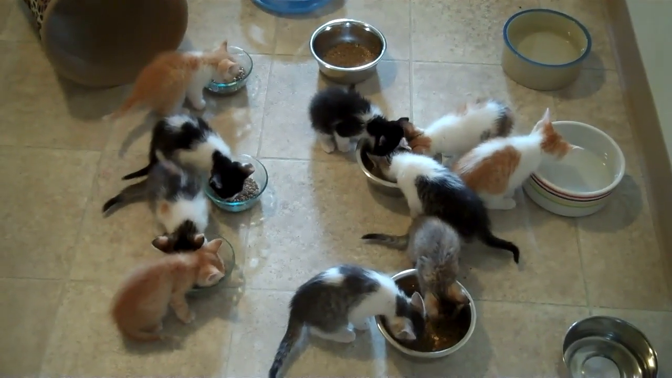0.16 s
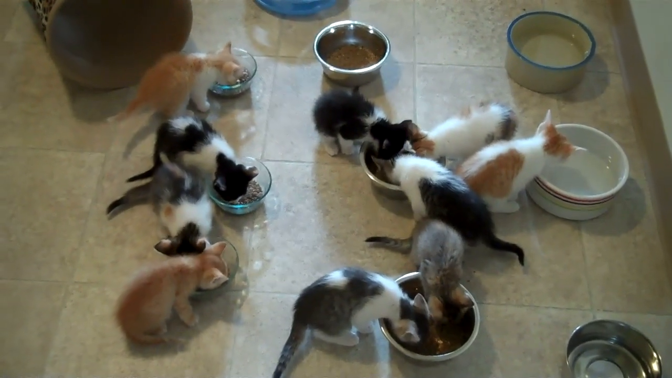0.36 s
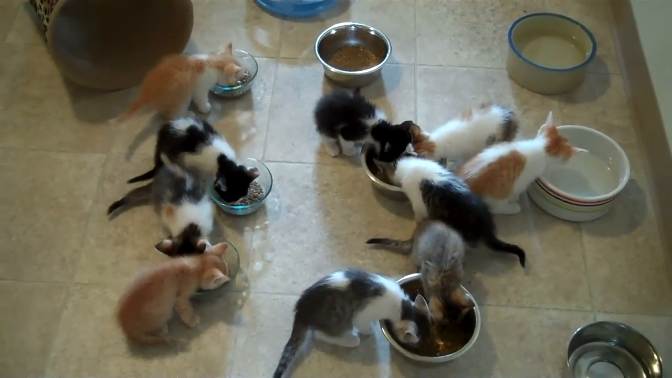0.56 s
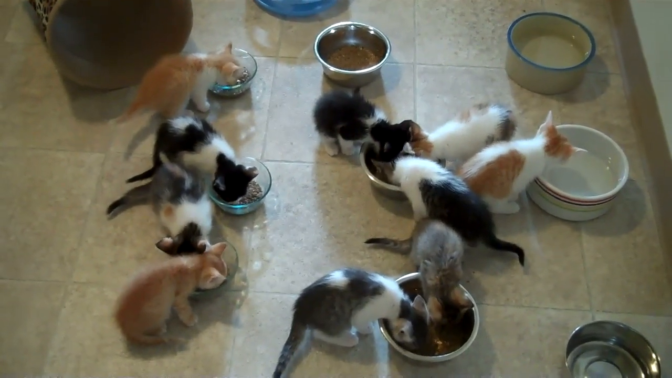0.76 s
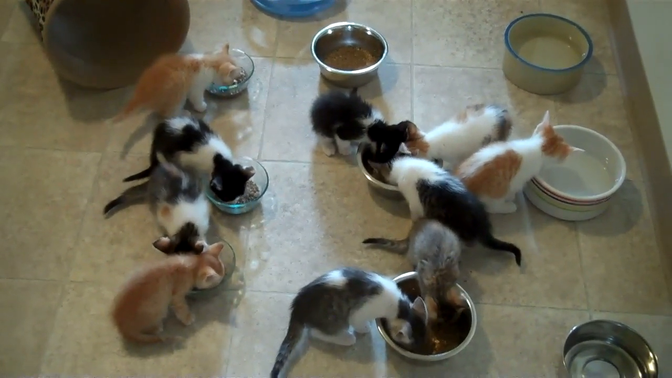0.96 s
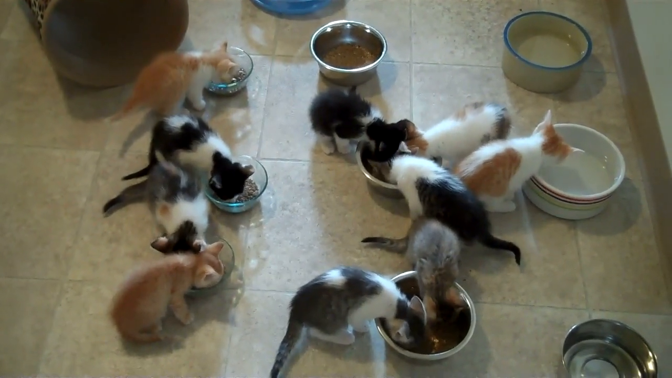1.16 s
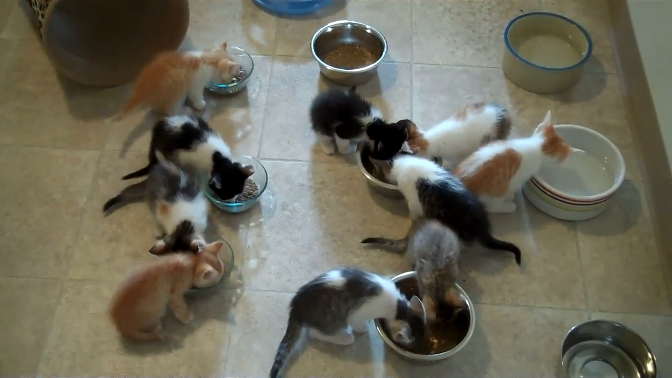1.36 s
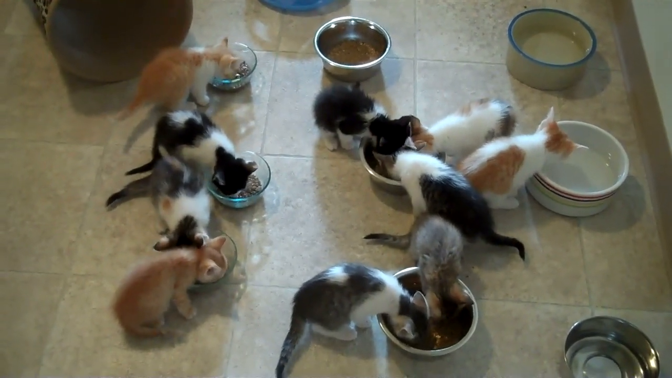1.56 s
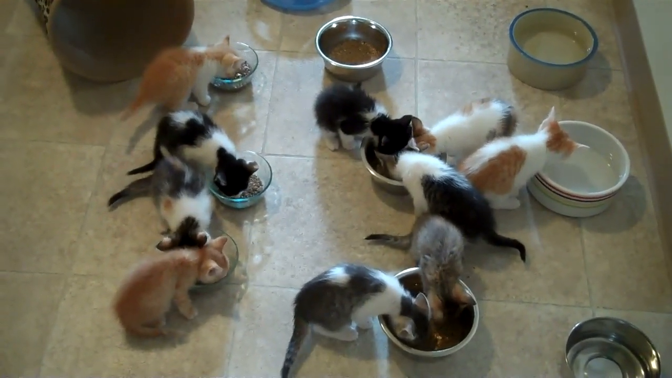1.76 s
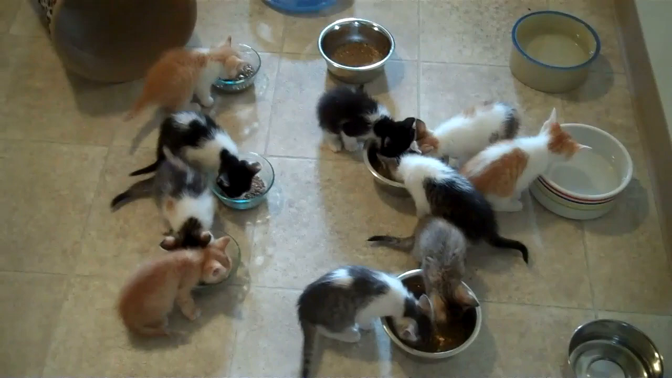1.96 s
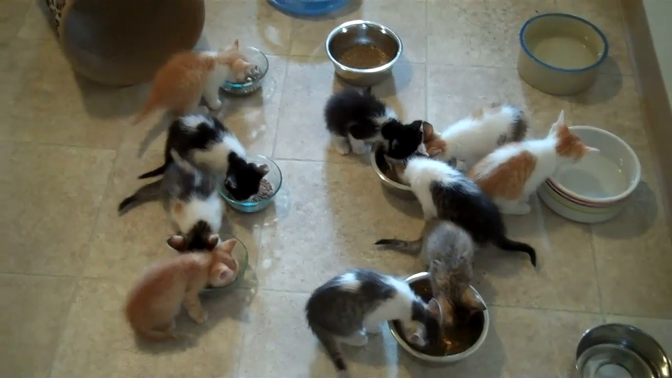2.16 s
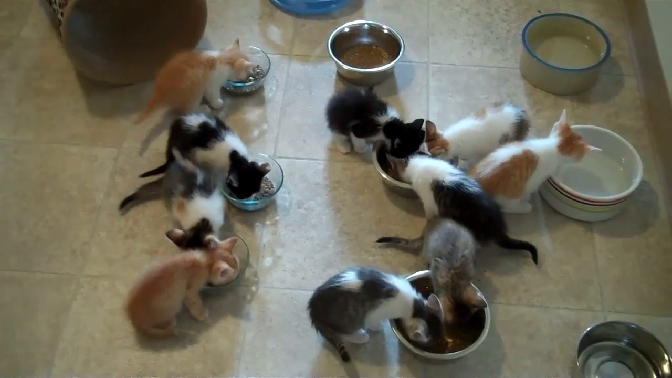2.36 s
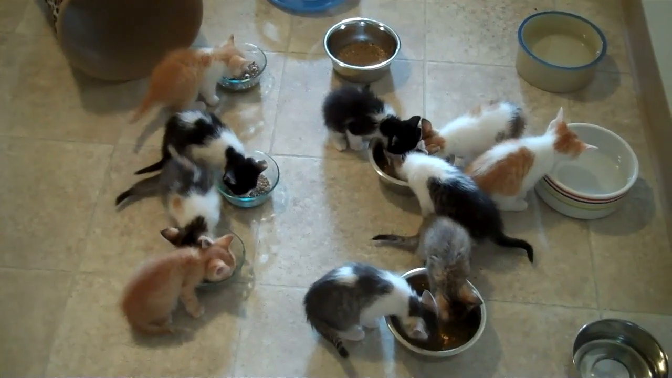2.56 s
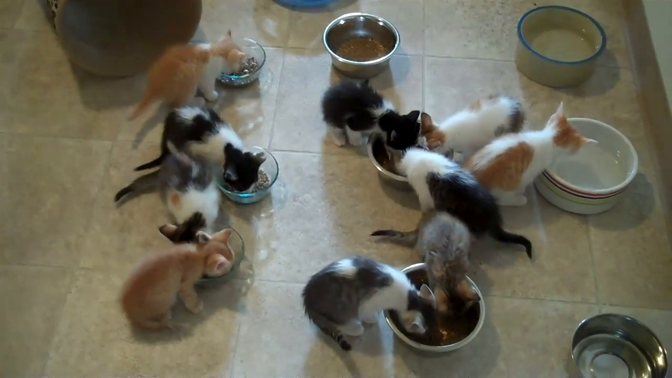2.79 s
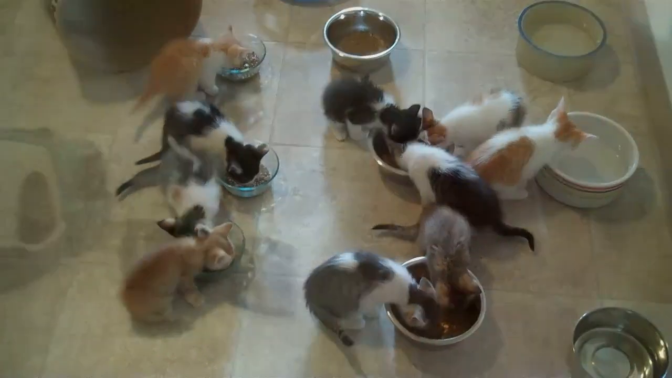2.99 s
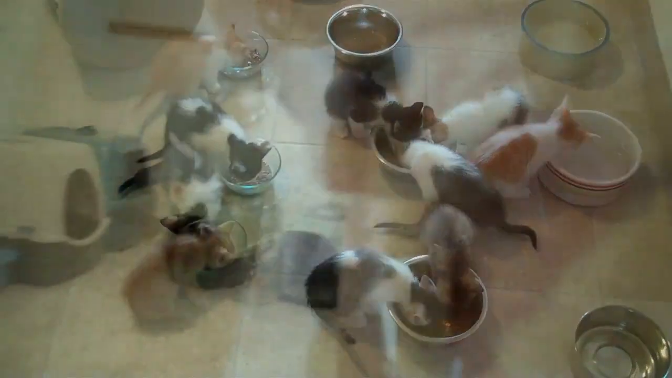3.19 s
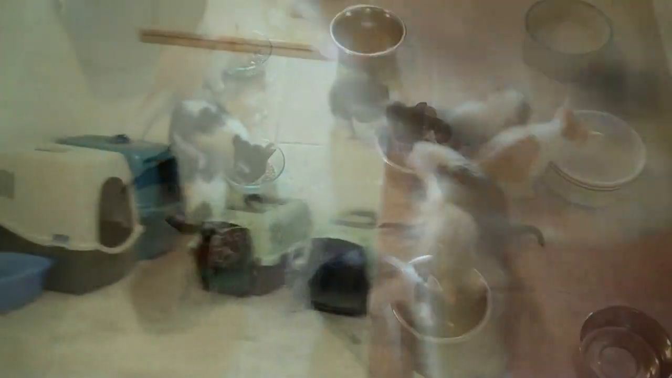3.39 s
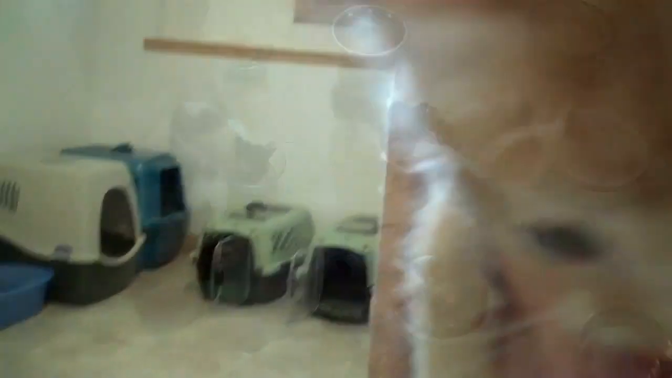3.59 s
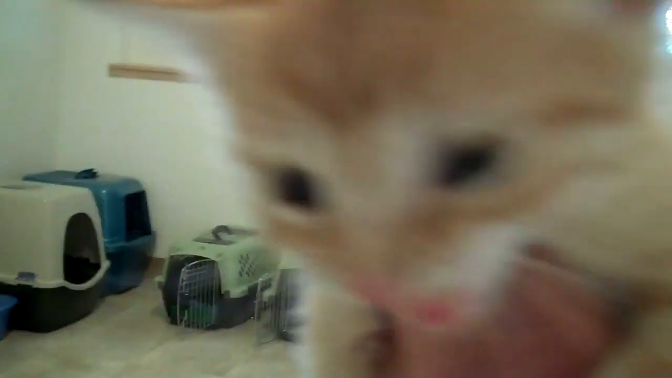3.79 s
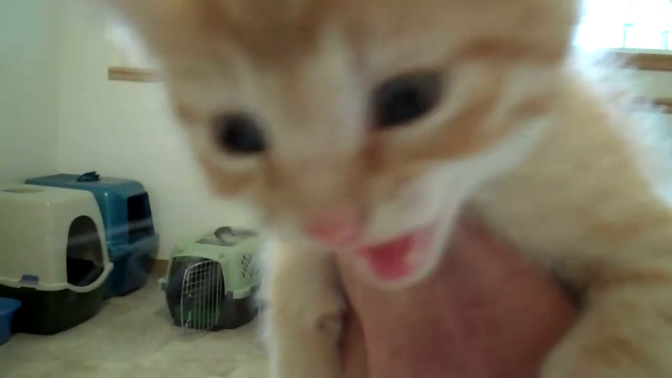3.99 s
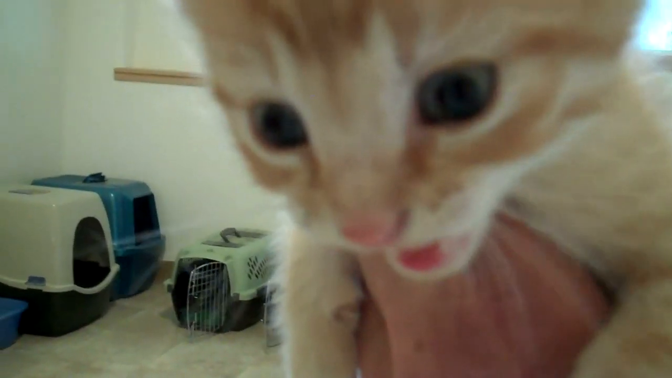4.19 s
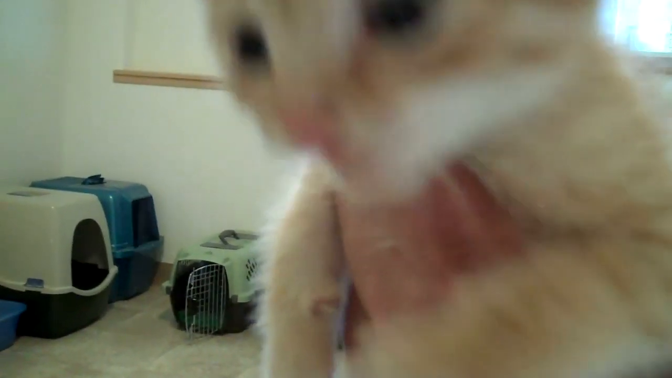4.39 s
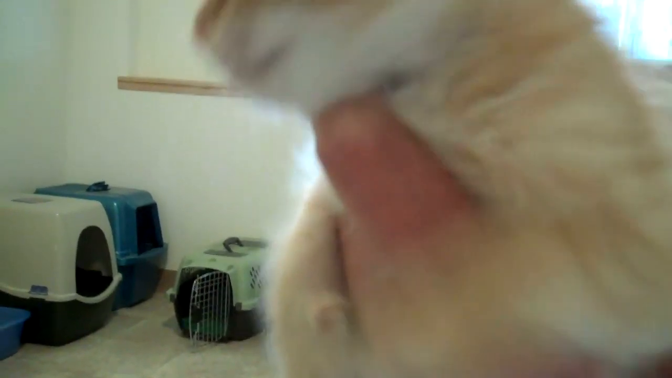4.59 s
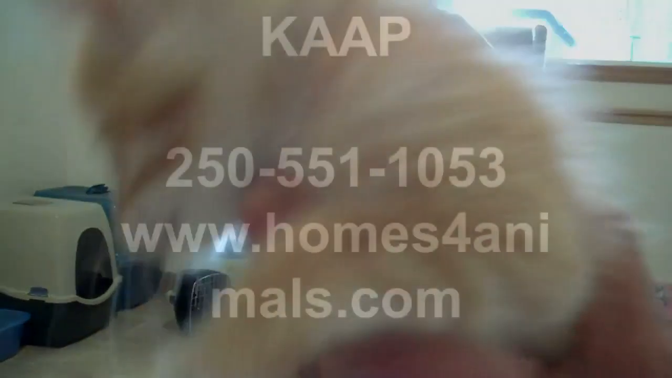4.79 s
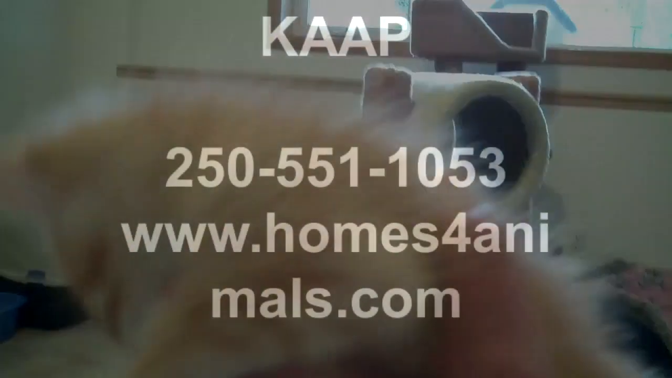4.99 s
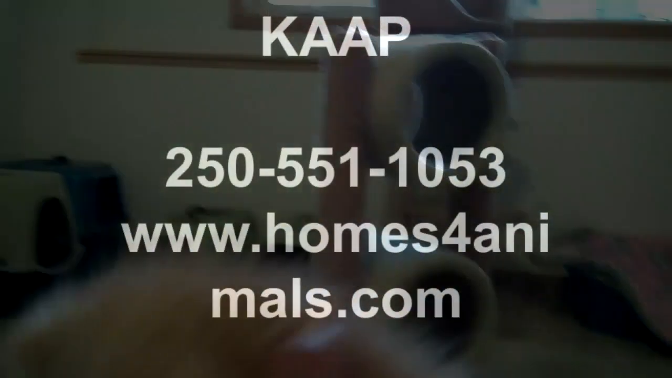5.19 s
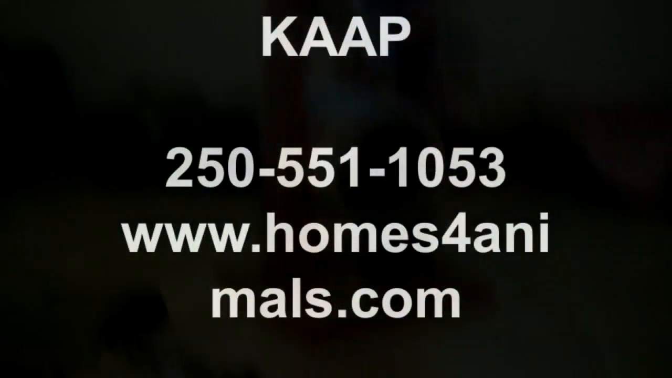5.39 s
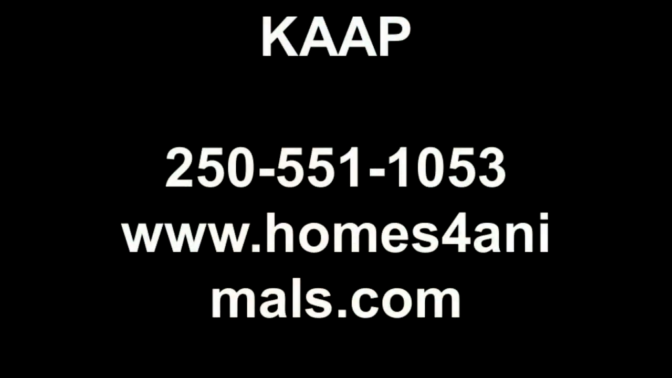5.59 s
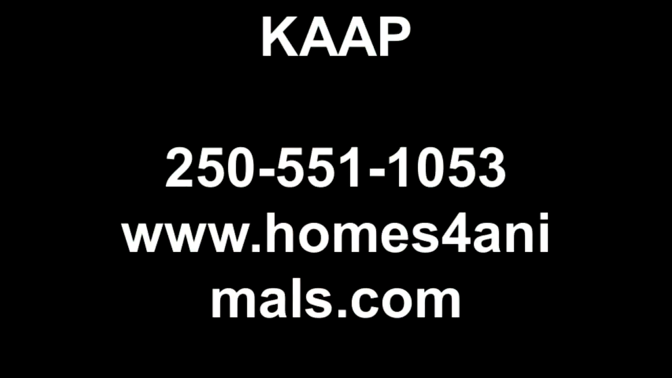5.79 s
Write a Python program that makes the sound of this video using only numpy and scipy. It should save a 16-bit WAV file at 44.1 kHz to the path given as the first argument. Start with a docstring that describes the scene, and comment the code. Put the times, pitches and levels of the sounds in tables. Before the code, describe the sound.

Kittens crunch dry food with faint ticks and bowl clinks in a quiet room, then one close kitten gives a loud, piercing meow.

```python
"""A close kitten gives one loud, piercing meow: vocal fold harmonics and breath through a mouth
that opens and closes, with wet smacks and soft hiss around it. Before that, kittens eat dry food
in a small room: kibble snaps and crumbles, nudged bowls ring, jaws patter.
Two faint mews come from across the room. Quiet room tone lies under it all; the end fades out."""
import sys
import numpy as np
from scipy import signal
from scipy.fft import rfft, irfft, next_fast_len
from scipy.io import wavfile
from scipy.ndimage import map_coordinates

SR = 44100
rng = np.random.default_rng(int(sys.argv[2]) if len(sys.argv) > 2 else 0)


def transcribe(signal):
    """Save signal, clipped to [-1, 1], as a 16-bit WAV file at the path in sys.argv[1]."""
    frames = np.atleast_2d(signal).T
    limited = np.clip(frames, -1, 1)
    pcm = np.round(limited * 32767).astype(np.int16)
    wavfile.write(sys.argv[1], SR, pcm)


N = 257984
TIME = np.arange(N) / SR
RECEDE_S, RECEDE_LENGTH_S = 2.7, 0.91  # chewing and room tone drop as the close kitten comes near

# Microphone colour: the highest treble is louder on the left.
# Each row: frequency in Hz, left minus right in dB.
CLOSE_BALANCE = [(700, -1), (1200, 0.5), (3500, 0), (6000, -2.5), (7300, 6), (8600, 18), (14000, 17.5)]


def meow(soften_db=-20, ear_lag_s=.000015):
    """Vocal fold harmonics and breath, shaped by a mouth that opens and closes."""
    # The call creaks, leaps up, sags, drops and flicks. Each row: time in seconds, pitch in Hz.
    contour = [(3.79, 607), (3.82, 579.3), (3.845, 711), (3.882, 719), (3.914, 1064), (3.936, 1203),
               (3.98, 1224), (4.03, 1232), (4.1, 1213), (4.165, 1218), (4.27, 1163), (4.32, 1164),
               (4.4, 1125), (4.44, 1119), (4.49, 1063), (4.526, 973), (4.546, 689.4), (4.558, 731),
               (4.567, 1150)]
    # Throat response. Each row: frequency in Hz, gain in dB nearly shut, half open, wide open.
    throat = [(598, -0.5, -15, -26.5), (1135, 4.5, 2, -13), (1450, -12.5, -9.5, -16.5),
              (2232, -8.5, -13, -9.5), (3310, -7, 4.5, -2.5), (4592, -21, -16.5, -1),
              (5276, -24.5, 0.5, 18), (5740, -11.5, 15.5, 20.5), (7070, -3.5, 5, 16.5), (7100, -4.5, 3, 25),
              (8685, -16, -1.5, -1), (9470, -45.5, -7, -6.5), (10800, -44, -25.5, -14.5),
              (13480, -59, -50, -44)]
    t = np.arange(round(contour[0][0] * SR), round(contour[-1][0] * SR)) / SR
    n = len(t)
    pitch = np.interp(t, *np.transpose(contour))
    slack = np.clip((1130 - pitch) / 300, 0, 1)  # slack folds beat unevenly and close softly
    db, shrill_db, rough = vocal_effort(t, pitch, slack)
    waver = rough * ((.005 + .028 * slack) * wobble(900, n) + .0018 * wobble(300, n))
    waver += .012 * np.sqrt(slack) * wobble(190, n)
    phase = 2 * np.pi * np.cumsum(pitch * (1 + waver)) / SR
    mouth = mouth_opening(t, pitch)
    shares = [np.clip(1 - abs(2 * mouth - i), 0, 1) for i in range(3)]
    shapes = [np.array(throat)[:, [0, i + 1]] for i in range(3)]
    treble = lambda hz: along([(4300, 0.049), (5600, 1)], hz)
    voice = np.zeros(n)
    for k in range(1, 13):
        hz = k * pitch
        throat_db = sum(share * along(shape, hz) for share, shape in zip(shares, shapes))
        folds_db = soften_db * np.sqrt(slack) * (k > 8) + 3 * slack * wobble(250, n) * (k > 1)
        flutter_db = .55 * wobble(45, n)
        gain = amp(db + throat_db + shrill_db * treble(hz) + folds_db + flutter_db)
        voice += gain * np.cos(k * phase - np.pi * np.sqrt(hz / 400))
    voice *= 1 + .055 * rough * wobble(700, n)  # shimmer
    # Air spurts through the folds once a cycle; slack folds leak more.
    spurts = (1 + .7 * np.cos(phase)) * amp(2 * wobble(130, n))
    leak = rough * amp(db + shrill_db - 8.5 + 12.5 * slack ** 2)
    low_cut = lambda hz: along([(400, .03), (750, 1)], hz)
    for share, shape, low_db in zip(shares, shapes, [-5, -14.5, -17.5]):
        colour = lambda hz: amp(along(shape, hz) + low_db * (1 - treble(hz))) * low_cut(hz)
        voice += share * leak * filtered(rng.standard_normal(n) * spurts, colour)
    out = np.zeros(N)
    add(out, t[0], voice)
    delay = lambda hz: np.exp(1j * np.pi * hz * ear_lag_s * np.array([[-1], [1]]))
    return filtered(out, lambda hz: ears(along(CLOSE_BALANCE, hz)) * delay(hz))


def mouth_opening(t, pitch, wide_hz=1257.5, closing_hz=190, lag_s=0.0098):
    """The mouth follows the pitch a little late: 0 shut, 1 wide."""
    late_pitch = np.interp(t - lag_s, t, pitch)
    return np.minimum(np.exp((late_pitch - wide_hz) / closing_hz), 1)


def vocal_effort(t, pitch, slack, press_s=3.935, relaxed_s=4.555, edge_s=.003, db_per_octave=13):
    """Level, treble gain and roughness: higher is louder, pressed is shriller, strained is hoarser."""
    # Pushes of effort. Each row: centre in seconds, width in seconds, treble gain in dB.
    pushes = [(3.966, 0.033, 4), (4.05, 0.048, 0.8), (4.175, 0.033, -0.1), (4.507, 0.031, 3.5)]
    edges = ramp(t, t[0], edge_s) * ramp(-t, -t[-1], edge_s)
    pressed = ramp(t, press_s, .0006) * ramp(-t, -relaxed_s, 0.022)
    hump = lambda s, width_s: np.exp(-((t - s) / width_s) ** 2)
    strain = sum(hump(s, width_s) for s, width_s, _ in pushes)
    push_db = sum(db * hump(s, width_s) for s, width_s, db in pushes)
    swell_db = 4.5 * hump(4.21, .11)  # low harmonics fill out in mid-call
    db = -34 + db_per_octave * np.log2(pitch / 1195) + swell_db + 20 * np.log10(edges + 1e-6)
    unpressed_db = -27 * mouth_opening(t, pitch)
    shrill_db = pressed * (1 + push_db - swell_db) + (1 - pressed) * unpressed_db
    rough = .6 + .4 * np.maximum(slack, strain) + .17 * wobble(28, len(t))
    return db, shrill_db, np.clip(rough, 0, 1)


def muzzle():
    """Wet smacks, handling ticks and soft puffs of hiss at the close kitten's mouth."""
    # Smacks and ticks. Each row: start in seconds, level in dB, length in seconds, relative thud in dB.
    smacks = [(3.749, -50.5, 0.011, 5), (3.77, -42.5, 0.0014, -16.5), (3.778, -51, 0.0012, -34.5),
              (3.811, -24, 0.0054, -30.5), (3.8122, -20.5, 0.0023, -32.5), (4.559, -39.5, 0.0017, -5),
              (5.219, -65, 0.0022, 16.5)]
    # Puffs. Each row: peak time in seconds, level in dB, rise in seconds, t60 in seconds.
    hisses = [(3.81, -50, 0.028, 0.33), (4.574, -42, .01, 0.15), (4.646, -61.5, .035, 0.41),
              (4.785, -58, 0.0572, 0.54)]
    # Spectra of smack, thud and hiss. Each row: frequency in Hz, gain in dB.
    smack_colour = [(150, -58), (600, -35), (2000, -29), (4000, -12.5), (5600, -21.5), (7000, 4), (8300, 0),
                    (9000, -13.5), (10000, -10.5), (12000, -26.5), (14000, -35)]
    thud_colour = [(60, -36), (200, -20), (450, -7), (1100, 6), (2200, -9), (3100, -0.5), (4500, -17.5),
                   (9000, -33.5)]
    hiss_colour = [(150, -49), (500, -24.5), (2000, -9.5), (4000, -10), (5500, -10), (7200, 1), (8300, -6),
                   (10000, -18.5), (14000, -30)]
    out, t = np.zeros(N), np.arange(SR // 20) / SR
    for s, db, length_s, thud_db in smacks:
        age = t / (length_s / 2)
        envelope = age * np.exp(1 - age * age)
        burst = envelope * (noise(smack_colour, len(t)) + amp(thud_db) * noise(thud_colour, len(t)))
        burst *= np.linalg.norm(envelope) / np.linalg.norm(burst)
        add(out, s, amp(db) * np.hypot(1, amp(thud_db)) * burst)
    puffs = sum(ramp(TIME, s - rise_s, rise_s) * amp(db - 60 * np.maximum(TIME - s, 0) / t60_s)
                for s, db, rise_s, t60_s in hisses)
    out += puffs * amp(1.4 * wobble(140, N)) * noise(hiss_colour, N)
    return filtered(out, lambda hz: ears(.6 * along(CLOSE_BALANCE, hz)))


def crunches(crack_db=11, crumble_db=-17, q=6):
    """Each kibble snaps, then crumbles in weaker cracks."""
    # Cracks. Each row: start in seconds, level in dB, resonance in Hz, body in dB (capped at 0).
    cracks = [(0.1076, -43, 5940, -17), (0.24, -41, 5500, -13), (0.273, -43.5, 5800, -12),
              (0.3148, -42.5, 8400, -13), (0.4668, -35, 7100, -20), (0.621, -38, 8400, -35),
              (0.7248, -38, 6800, -10), (0.8323, -42, 7550, -30), (0.9142, -42.5, 5600, -1),
              (0.978, -42, 8200, -12), (1.2163, -39.5, 8300, -15), (1.3106, -40, 6200, -33),
              (1.4395, -40.5, 2360, 3), (1.5037, -37.5, 7900, -2), (1.6254, -45, 6200, -28),
              (1.7284, -40, 6300, 2), (1.891, -47.5, 8550, -22), (2.011, -43, 6900, -8),
              (2.0377, -40, 7100, -13), (2.139, -38, 7540, -24), (2.1405, -30, 9300, -41),
              (2.2534, -37.5, 7150, -11), (2.36, -43.5, 7140, 4), (2.4784, -43.5, 7550, 3),
              (2.6747, -40, 8910, -30), (2.8243, -44, 4500, -8), (3.0238, -44, 5200, -32),
              (3.407, -43, 5600, -36)]
    # Higher cracks are louder on the left, where the microphone picks up more treble.
    # Each row: resonance in Hz, left minus right in dB.
    balance = [(5800, -1.5), (7000, 9), (8000, 11.5)]
    # Crunch spectrum. Each row: frequency in Hz, gain in dB.
    colour = [(500, -14), (2000, -1), (8200, 2), (9200, -6.5), (11000, -12), (14500, -15.5)]
    out, t = np.zeros((2, N)), np.arange(SR // 10) / SR
    for s, db, hz, body_db in cracks:
        snap = ramp(t, 0, 0.00037) * np.exp(-t / .0017) * rng.standard_normal(len(t))
        crumble = amp(crumble_db + 7.5 * wobble(440, len(t))) * np.exp(-t / .011)
        force = snap + crumble * rng.standard_normal(len(t))
        body = .5 * amp(min(body_db, 0)) * resonate(force, 2350, 1)
        crack = resonate(force, hz, q) + 0.21 * force + body
        crack /= np.linalg.norm(crack[t < .005])
        add(out, s, ears(along(balance, hz)) * amp(db + crack_db) * crack)
    return filtered(out, lambda hz: amp(along(colour, hz)))


def bowls():
    """A nudged bowl rings briefly (high Q); a shifted one clatters in a broad band (low Q)."""
    # Knocks. Each row: start in seconds, level in dB, ring in Hz, t60 in seconds, Q.
    knocks = [(0.337, -50.5, 1180, 0.1, 2.6), (0.718, -56, 2950, .09, 2.5), (0.913, -50, 2510, 0.039, 6.8),
              (0.992, -45, 5780, 0.041, 6.9), (1.148, -45.5, 4800, 0.06, 5.5), (1.152, -45, 2670, 0.027, 8),
              (1.4398, -39.5, 2380, 0.023, 7), (2.155, -42.5, 4940, 0.026, 1.6),
              (2.168, -49, 8100, 0.25, 7.4), (2.484, -57, 1300, 0.085, 0.91),
              (2.544, -55.5, 1110, 0.1, 1.8), (2.712, -55.5, 1520, 0.16, 1.9),
              (3.347, -55, 424, 0.12, 11.5), (3.513, -50, 1010, 0.022, 2.7)]
    out, t = np.zeros(N), np.arange(SR // 4) / SR
    for s, db, hz, t60_s, q in knocks:
        purity = q / 16
        clatter = unit(resonate(rng.standard_normal(len(t)), hz, q))
        ring = purity * np.sin(2 * np.pi * hz * t) + 0.86 * (1 - purity) * clatter
        add(out, s, amp(db - 60 * t / t60_s) * ring)
    return ears(1.5) * out


def chewing(cracks_per_s=110, level_db=-64, recede_db=-8, wet=0.95):
    """Many small jaws: a patter of tiny, uneven cracks that recedes before the meow."""
    # Patter spectrum. Each row: frequency in Hz, gain in dB (halved below).
    colour = [(880, -36), (1500, -6.5), (2090, -1.5), (2410, 2), (2890, 1.5), (3950, -10), (8050, 3),
              (8850, -20), (10400, -21), (13700, -16), (14500, -22.5)]
    out, t = np.zeros((2, N)), np.arange(SR // 100) / SR
    for when, size, tone, side in rng.random((int(cracks_per_s * N / SR), 4)):
        snap = np.exp(-t / 0.0013) * rng.standard_normal(len(t))
        grain = amp(-1.5 * np.log(size + .04)) * resonate(snap, 3500 * 2.69 ** tone, q=2.9)
        add(out, when * N / SR, ears(14 * side - 4) * grain)
    out = filtered(out, lambda hz: amp(.5 * along(colour, hz)))
    gain = amp(level_db + recede_db * ramp(TIME, RECEDE_S, RECEDE_LENGTH_S))
    return gain * unit(out + wet * room(out))


def far_mews(direct_db=-10, wall_db=-1, attack_s=0.056, fall_db_per_s=100):
    """Thin wavering calls of other kittens, heard mostly off the walls."""
    # Mews. Each row: start in seconds, time until decay in seconds, pitch in Hz, level in dB.
    mews = [(2.9, 0.068, 1305, -70.5), (4.76, 0.14, 997, -65.5)]
    # Throat response. Each row: frequency in Hz, gain in dB.
    throat = [(1000, 2), (2000, 0.5), (2600, -14), (2950, 6), (4000, -17), (6000, 0.5), (8000, -11),
              (11000, -33)]
    out, t = np.zeros(N), np.arange(SR // 2) / SR
    for s, length_s, hz, db in mews:
        pitch = hz * (1 - 0.11 * np.exp(-t / 0.035) - .17 * (t - length_s / 2))  # scoops up, then sags
        envelope = ramp(t, 0, attack_s) * amp(db - fall_db_per_s * np.maximum(t - length_s, 0))
        waver = .026 * wobble(260, len(t)) + .008 * wobble(30, len(t))
        phase = 2 * np.pi * np.cumsum(pitch * (1 + waver)) / SR
        voice = sum(amp(along(throat, k * pitch)) * np.sin(k * phase) for k in range(1, 9))
        add(out, s, envelope * voice)
    return amp(direct_db) * out + amp(wall_db) * room(out)


def room(x, build_s=.004):
    """Diffuse reflections from walls and floor, different in each ear."""
    # Room decay. Each row: frequency in Hz, t60 in seconds.
    decay = [(200, .5), (2000, 0.25), (7000, 0.14), (14000, 0.05)]
    hz, t, bands = signal.stft(rng.standard_normal((2, SR // 2)), SR, nperseg=256)
    envelope = amp(-60 * t / along(decay, hz)[:, None]) * (1 - np.exp(-t / build_s))
    tail = signal.istft(bands * envelope, SR, nperseg=256)[1]
    return signal.fftconvolve(np.atleast_2d(x), tail / np.linalg.norm(tail[0]), axes=1)[:, :N]


def room_tone(level_db=-62.5, recede_db=-1.5):
    """Quiet air and hiss, stronger on the left; the ears share mainly the midrange."""
    # Air spectrum. Each row: frequency in Hz, gain in dB.
    colour = [(15, -36.5), (25, -3.5), (85, -0.5), (153, -3), (282, 0), (549, -3), (1010, -0.5),
              (1430, -4.5), (2370, -4.5), (3440, -8), (7450, -4), (9220, -11), (13400, -12.5), (14500, -28)]
    shared_gain = [(130, 0), (300, 0.51), (1400, 0.69), (3500, 0.33), (10000, 0.0021)]
    balance_db = [(60, 3.5), (200, 5.5), (700, 5.0), (1500, 3), (4300, -4), (8000, 9.5), (13000, -1.5)]
    left, right, shared = noise(colour, (3, N))
    shared = filtered(shared, lambda hz: along(shared_gain, hz))
    tone = filtered(np.array([left, right]) + shared, lambda hz: ears(along(balance_db, hz)))
    drop_db = recede_db * ramp(TIME, RECEDE_S, RECEDE_LENGTH_S)
    return amp(level_db + drop_db + 0.493 * wobble(2.6, N)) * tone


def amp(db):
    """Decibels to gain."""
    return 10 ** (np.asarray(db) / 20)


def unit(x):
    """Scale to rms 1."""
    return x / np.sqrt(np.mean(x ** 2) + 1e-20)


def ramp(t, start_s, length_s):
    """Linear rise from 0 to 1."""
    return np.clip((t - start_s) / length_s, 0, 1)


def along(points, hz):
    """Interpolate (Hz, value) points on a log axis."""
    knots_hz, values = np.transpose(points)
    return np.interp(np.log(hz + 1), np.log(knots_hz + 1), values)


def wobble(knots_per_s, n):
    """Smooth random curve."""
    return map_coordinates(rng.standard_normal(n + 4), [np.arange(n) * (knots_per_s / SR)])


def filtered(x, response):
    """Apply a gain given as a function of Hz."""
    n = next_fast_len(x.shape[-1] + 4096)
    return irfft(rfft(x, n) * response(np.fft.rfftfreq(n, 1 / SR)), n)[..., :x.shape[-1]]


def noise(colour, shape):
    """Noise of rms 1 with a (Hz, dB) spectrum."""
    return unit(filtered(rng.standard_normal(shape), lambda hz: amp(along(colour, hz))))


def ears(balance_db):
    """Left and right gains with mean 1."""
    ratio = amp(np.atleast_1d(balance_db))
    return 2 * np.array([ratio, np.ones_like(ratio)]) / (1 + ratio)


def resonate(x, hz, q):
    """One resonance, Q at least 1."""
    return signal.lfilter(*signal.iirpeak(hz, max(q, 1), SR), x)


def add(track, start_s, sound):
    """Mix a sound into a track."""
    part = track[..., round(start_s * SR):][..., :sound.shape[-1]]
    part += sound[..., :part.shape[-1]]


def scene():
    """The close kitten and the meal in their room, over far mews and room tone."""
    meal = crunches() + bowls()
    kitten = meow() + muzzle()
    eating = meal + amp(-5) * room(meal) + chewing()
    return kitten + amp(-16.5) * room(kitten) + eating + far_mews() + room_tone()


def record(dry):
    """Overall gain, linear fade-out and low-pass."""
    gain_db, fade_end_s, fade_length_s, top_hz = 1.97, 5.764, 0.95, 14250
    fade = ramp(-TIME, -fade_end_s, fade_length_s)
    return filtered(dry * amp(gain_db) * fade, lambda hz: hz < top_hz)


dry = scene()
out = record(dry)
transcribe(out)
```